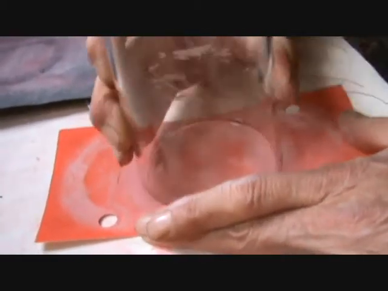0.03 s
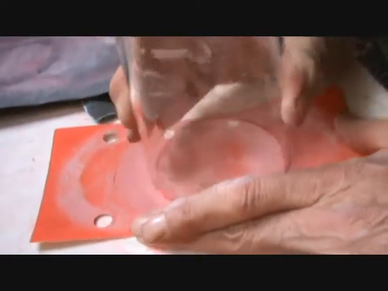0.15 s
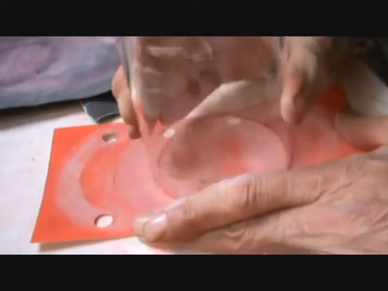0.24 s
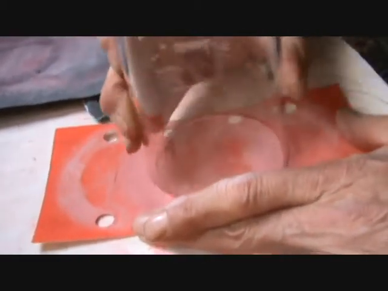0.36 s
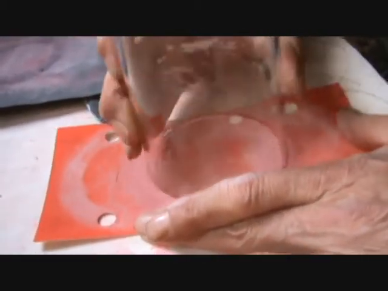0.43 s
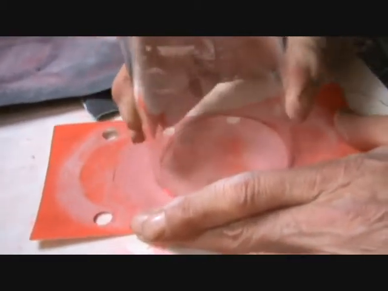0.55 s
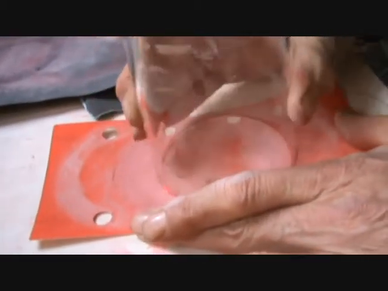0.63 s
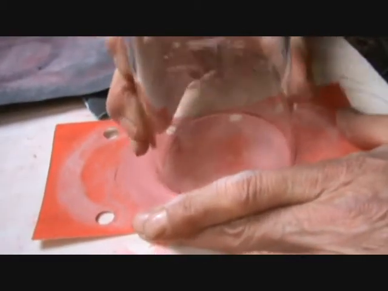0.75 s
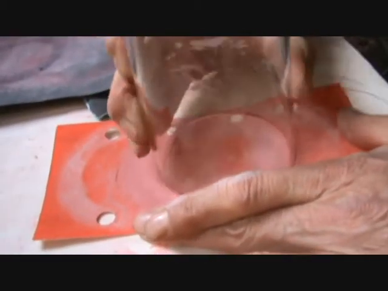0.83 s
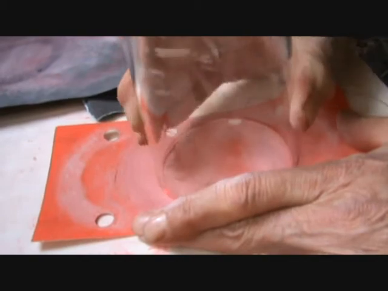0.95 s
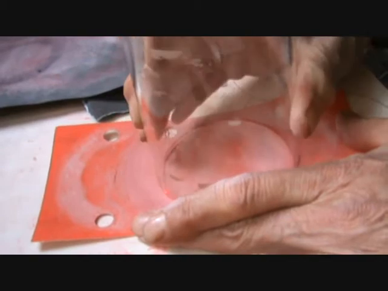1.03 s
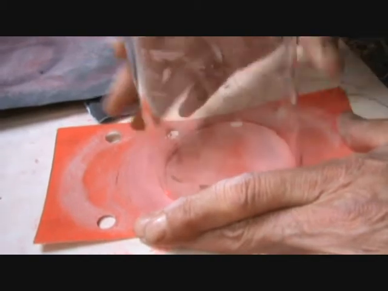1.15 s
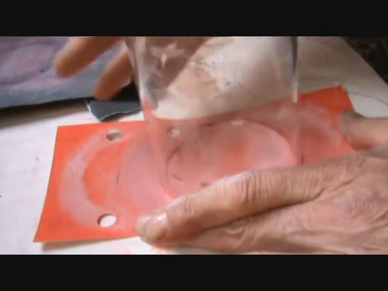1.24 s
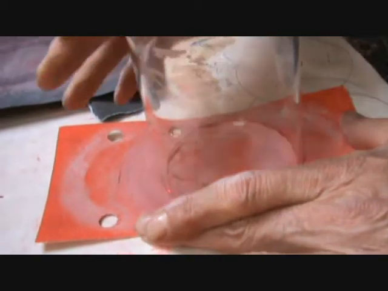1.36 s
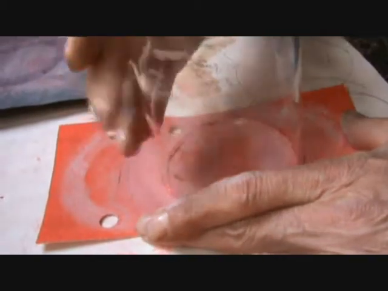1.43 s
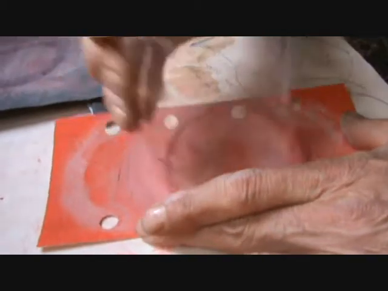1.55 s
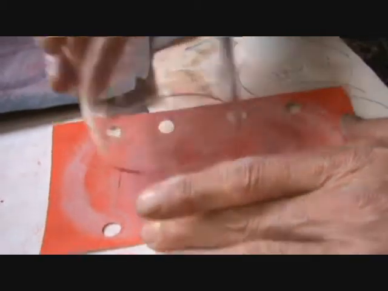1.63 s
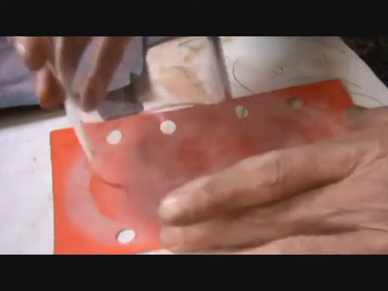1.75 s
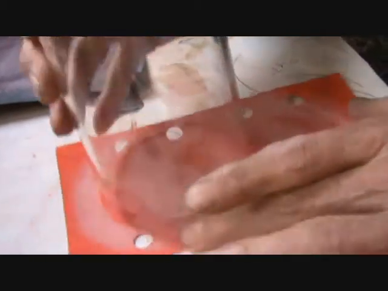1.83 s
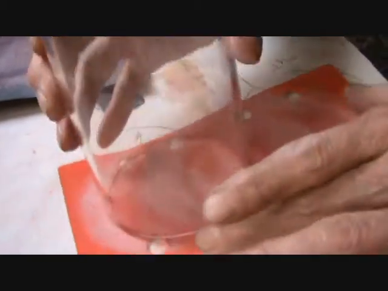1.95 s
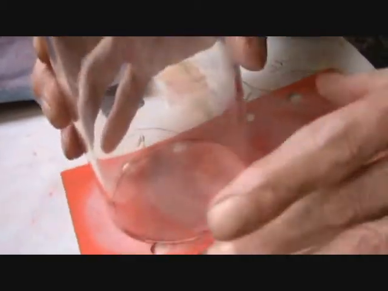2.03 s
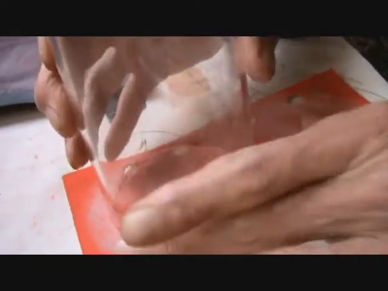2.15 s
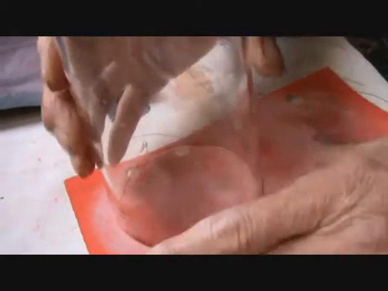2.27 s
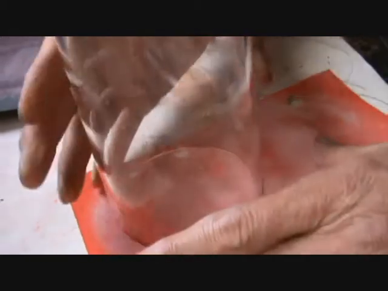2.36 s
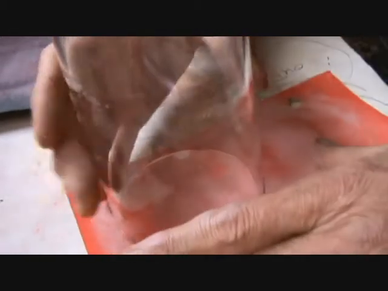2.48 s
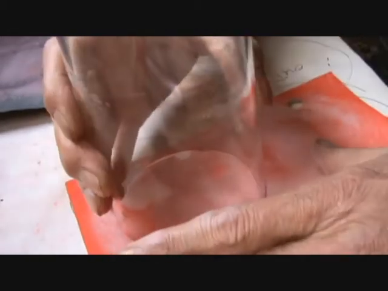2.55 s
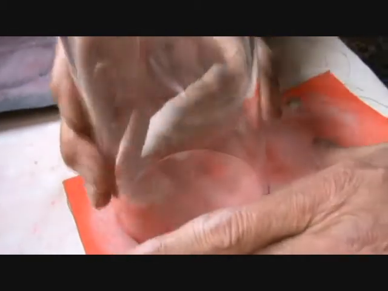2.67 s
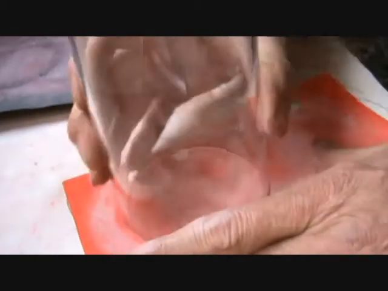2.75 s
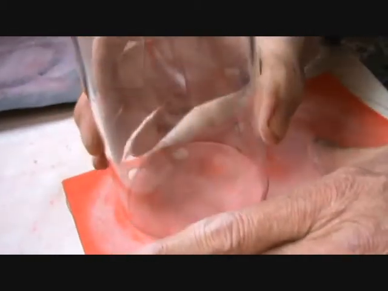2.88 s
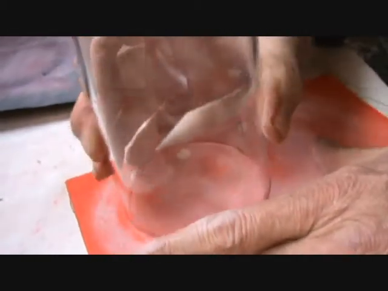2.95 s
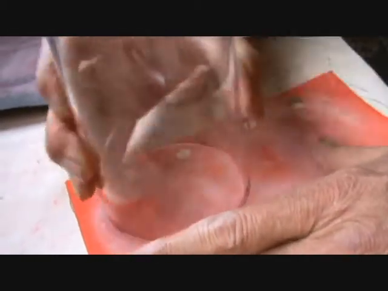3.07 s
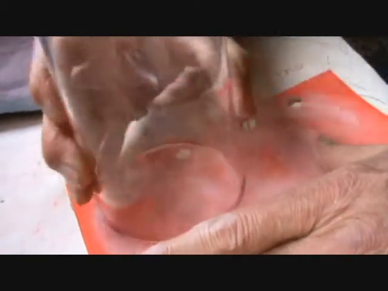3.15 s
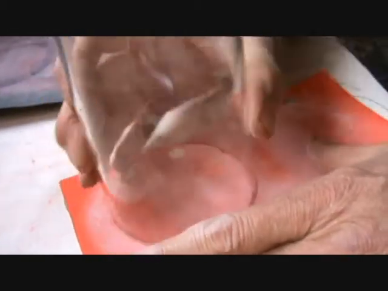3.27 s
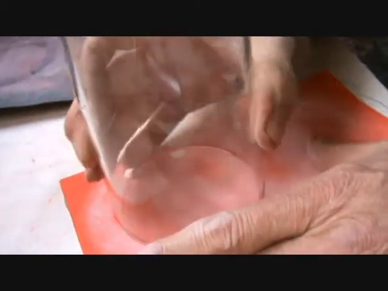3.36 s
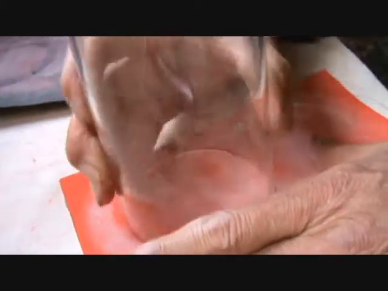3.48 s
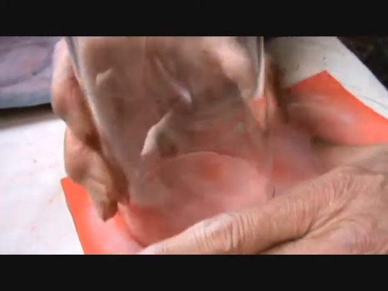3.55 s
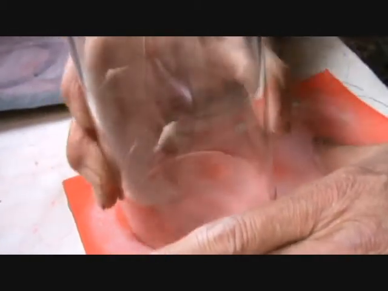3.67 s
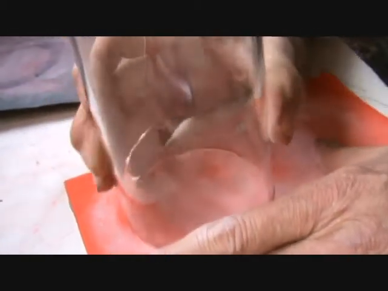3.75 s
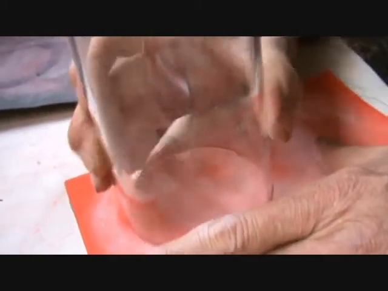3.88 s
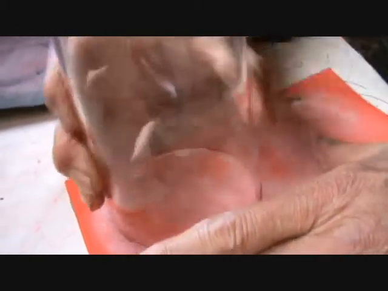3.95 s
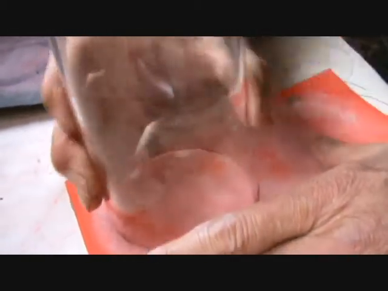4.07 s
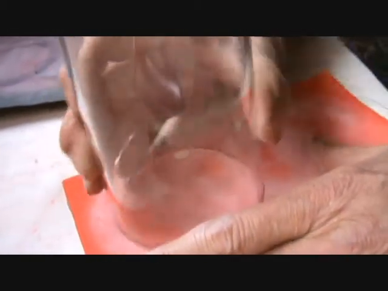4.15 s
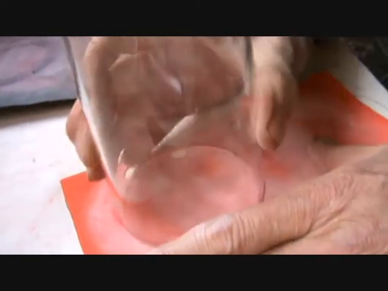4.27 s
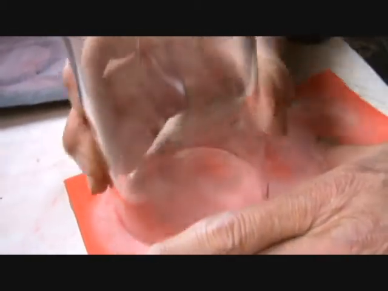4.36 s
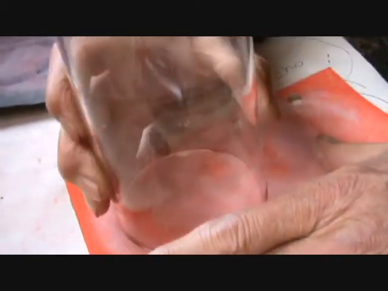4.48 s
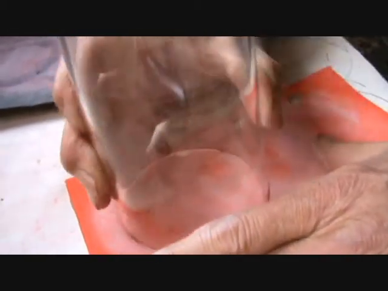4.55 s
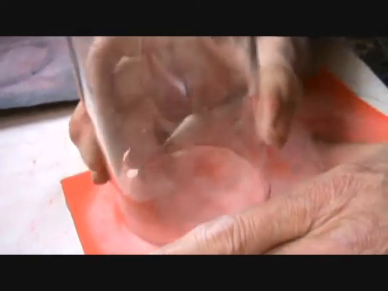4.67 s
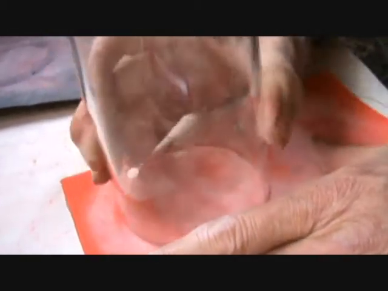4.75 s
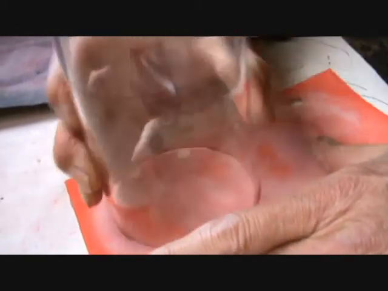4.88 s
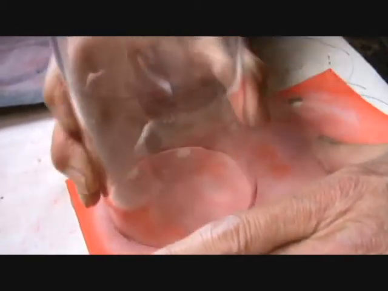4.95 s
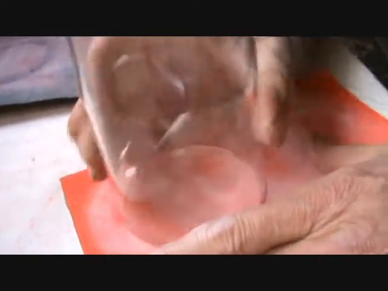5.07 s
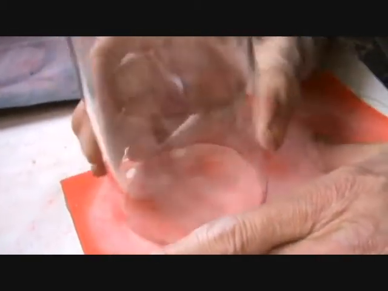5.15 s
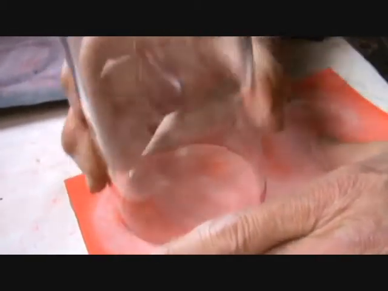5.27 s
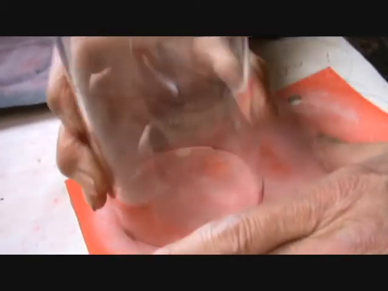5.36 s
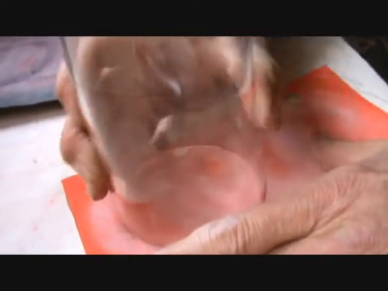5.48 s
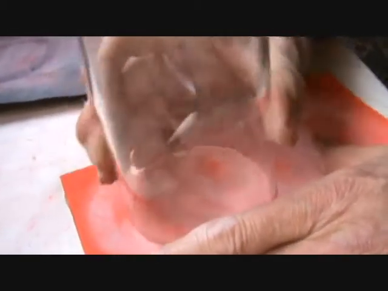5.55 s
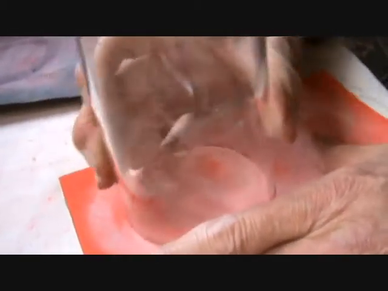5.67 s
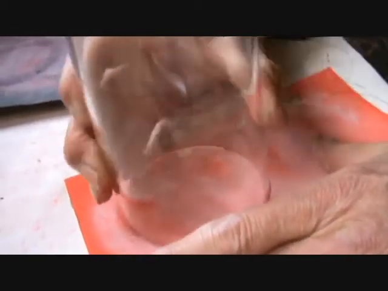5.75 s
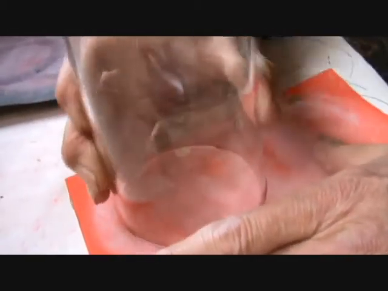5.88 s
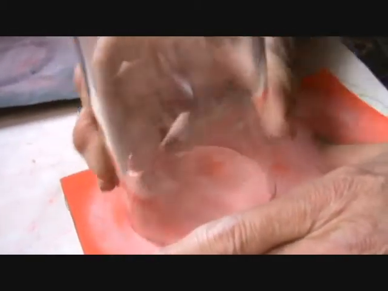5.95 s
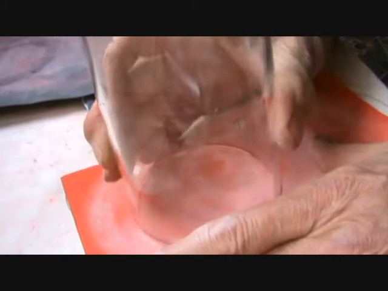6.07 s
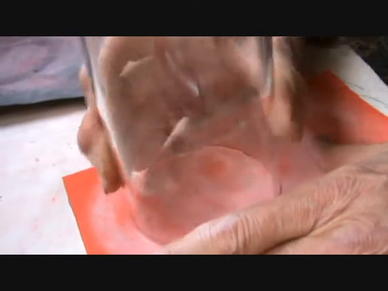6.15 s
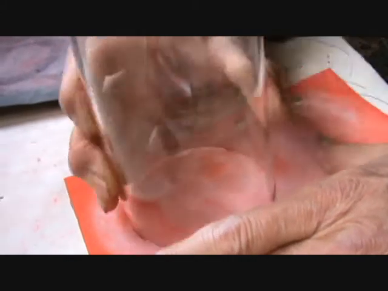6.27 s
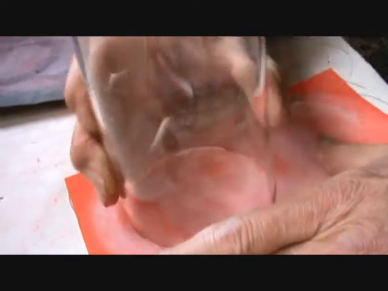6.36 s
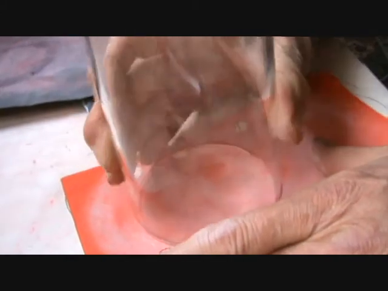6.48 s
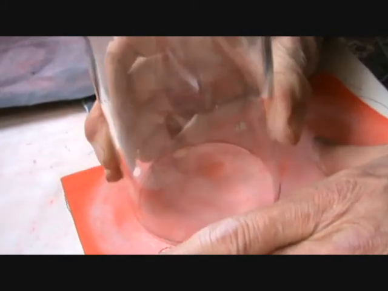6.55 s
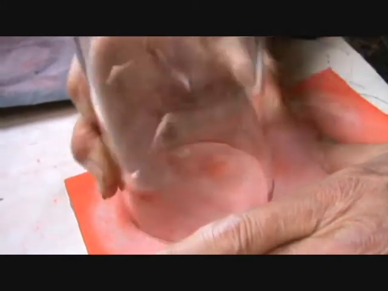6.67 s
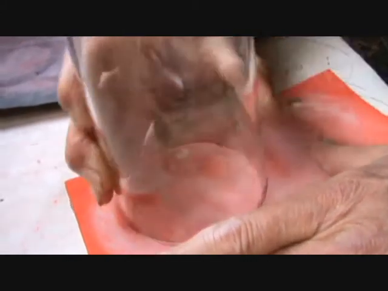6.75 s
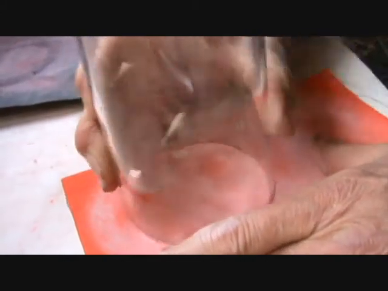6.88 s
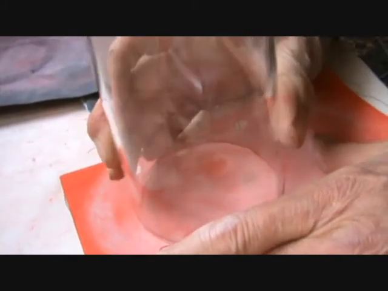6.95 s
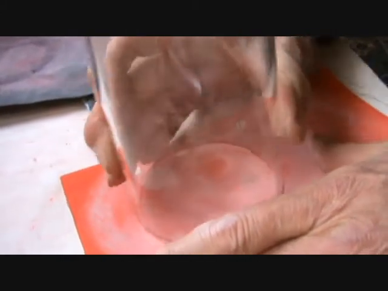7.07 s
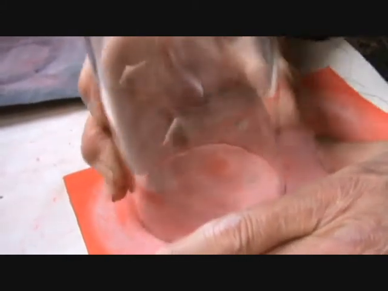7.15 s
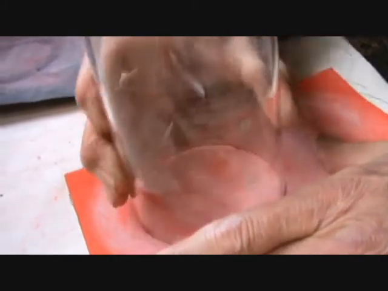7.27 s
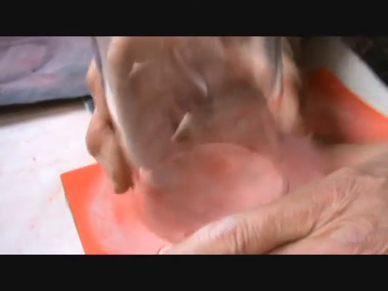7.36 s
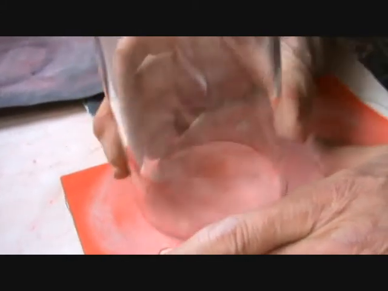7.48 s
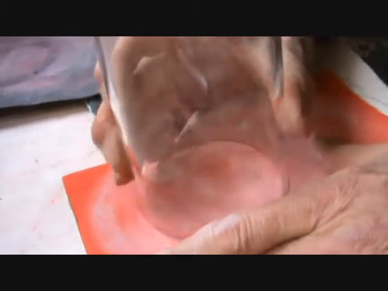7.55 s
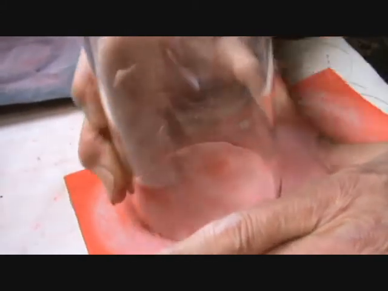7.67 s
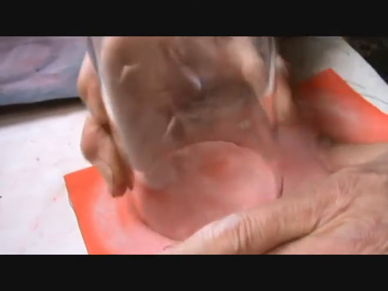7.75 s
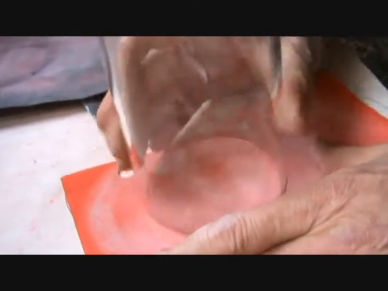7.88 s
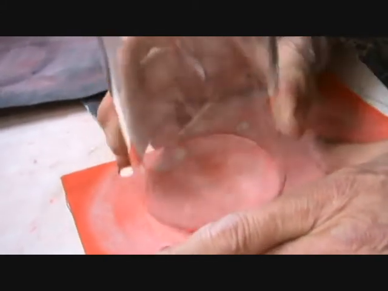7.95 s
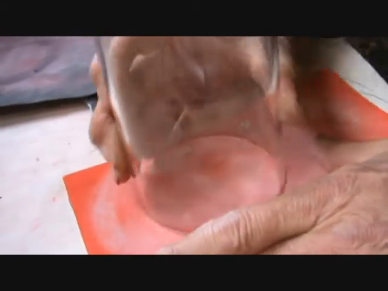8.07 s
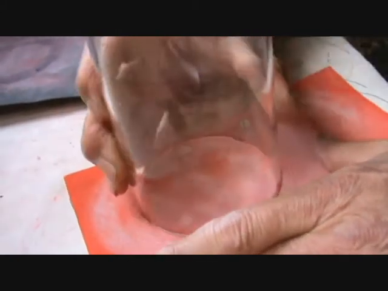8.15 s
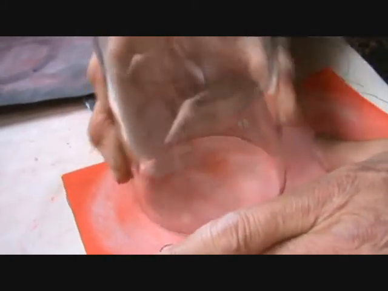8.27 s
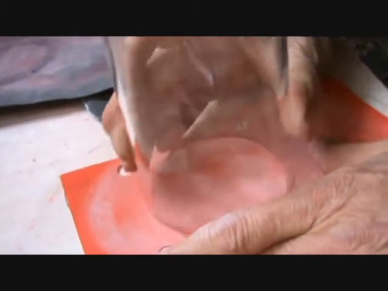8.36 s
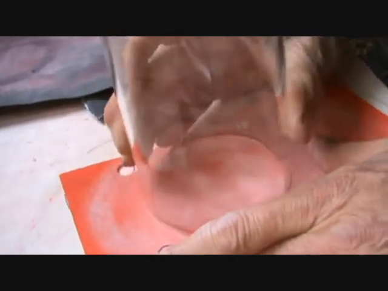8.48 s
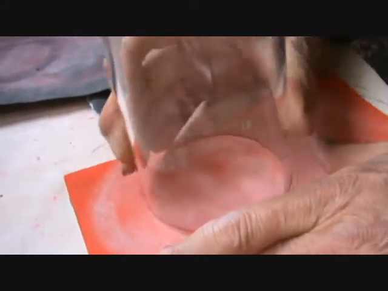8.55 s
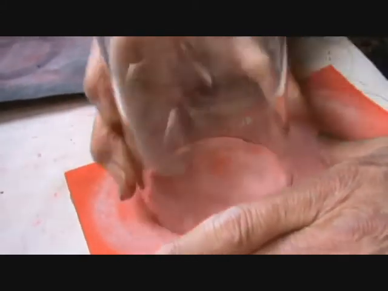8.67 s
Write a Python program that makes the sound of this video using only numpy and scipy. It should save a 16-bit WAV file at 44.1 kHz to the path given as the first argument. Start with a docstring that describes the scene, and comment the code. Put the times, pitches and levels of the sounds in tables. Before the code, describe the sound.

Close up on a workbench in a small, dry room, a hollow plastic tube is twisted on sandpaper: six quick rasping scratches, then a pause with light finger ticks, scuffs, sliding paper and dull bench thumps. The scratching resumes slightly slower and continues steadily to the end, with faint low shudders from the bench underneath. Close stereo microphone, quiet background hush.

```python
"""On a workbench in a small room, the rim of a wide plastic tube is twisted to and fro on sandpaper.
Streams of random grains make the scratch and excite resonances of the tube wall and the air inside.
In a pause the rim scuffs, the paper slides as swelling hiss, and pats boom through the bench modes.
Finger ticks are short tones with noise; a shaking bench, low rumble and steady hush lie underneath.
The stereo image is that of a close microphone with two ports."""
import sys
import numpy as np
from scipy import signal
from scipy.fft import rfft, irfft
from scipy.io import wavfile
from scipy.ndimage import uniform_filter1d

SR = 44100
rng = np.random.default_rng(int(sys.argv[2]) if len(sys.argv) > 2 else 0)


def master(y):
    """Save y as 16-bit WAV."""
    cut = np.clip(np.atleast_2d(y).T, -1, 1)
    pcm = np.round(cut * 32767)  # scale
    wavfile.write(sys.argv[1], SR, pcm.astype(np.int16))


N = 384552  # samples

# Twists of the rim: (start [s], length [s], scratch [dB], sag over the stroke [dB], second push [dB],
#  scratch fade [dB/s], air ring against scratch [dB],
#  bench shake delay [s], shake level [dB], shake pitch [Hz])
STROKES = [(0.0, 0.13, -23.5, 3, -0.5, 576, -12, .0, -43.5, 96.6),
           (0.175, 0.13, -21.5, 3, 3, 488, -14.5, 0.071, -31.5, 97.4),
           (0.384, 0.13, -19.5, 7.5, -0.5, 492, -11, 0.047, -42, 105.4),
           (0.573, .13, -21.5, 3.5, 1.5, 463, -13.5, 0.061, -37, 96.1),
           (0.776, 0.12, -22, 3.5, 2, 463, -11.5, 0.087, -31.5, 98.7),
           (0.962, 0.13, -21.5, 3, 1.3, 165, -10.5, 0.08, -36, 97),
           (2.733, 0.19, -26.5, -4, 4, 289, -13.5, 0.17, -42, 80),
           (3.06, 0.17, -20, 1, -2, 535, -11.5, 0.17, -45, 68.9),
           (3.28, 0.18, -18.5, 7, 0.5, 478, -19, 0.067, -42, 83),
           (3.524, 0.15, -17.5, 7.5, -0.8, 600, -13.5, 0.071, -50, 93.1),
           (3.753, 0.15, -21, 3.5, 0.5, 567, -10, 0.059, -46, 94),
           (3.982, .13, -21.5, 0.5, -1, 553, -13, 0.056, -42, 99.8),
           (4.168, 0.17, -22, 4, 3, 533, -10.5, .125, -38.5, 97.4),
           (4.43, 0.15, -20, 4.5, 2, 536, -12, 0.023, -48, 98.5),
           (4.645, 0.16, -23, 1, 0.7, 583, -12.5, .08, -37, 101),
           (4.891, 0.13, -19, 3.5, -2.5, 477, -12, 0.083, -30.5, 90.1),
           (5.071, 0.16, -21.5, 1.5, 3, 550, -17, 0.083, -42, 92.8),
           (5.317, 0.17, -21.5, 5.5, 4.5, 510, -12.5, 0.024, -45, 82),
           (5.549, 0.14, -19, 6, 3, 542, -17.5, .04, -45, 92.8),
           (5.789, 0.14, -18.5, 8, 0, 554, -12.5, 0.083, -40, 85.04),
           (5.992, 0.15, -18.5, 8, 1.7, 482, -13.5, .0, -50, 85),
           (6.236, 0.15, -21.5, 4.5, 0.2, 443, -9.5, 0.0434, -47.5, 81),
           (6.465, 0.15, -22, -0.5, -3, 520, -10.5, .07, -40, 97.5),
           (6.72, 0.12, -19, 4.5, 0, 500, -13.5, 0.073, -38.5, 94.5),
           (6.914, 0.16, -22, 3, 1.5, 560, -11.5, 0.1, -49, 103.7),
           (7.176, 0.15, -22.5, 2, 4, 468, -12, 0.032, -45.5, 73.8),
           (7.393, 0.17, -23, 0, -2.5, 450, -10, .04, -44.5, 68),
           (7.659, 0.14, -20, 3.5, -1.5, 470, -10.5, .05, -41, 80),
           (7.856, 0.15, -23, -3, -1.3, 400, -11.5, 0.084, -37.5, 80),
           (8.127, 0.15, -20.5, 4, 1, 457, -12.5, .025, -46, 70.5),
           (8.352, 0.18, -19, 7, -0.5, 472, -10.5, 0.19, -40, 98.5),
           (8.625, 0.16, -23, 9, 15, 440, -9, 0.081, -38, 79)]
# Brief touches of rim on paper: (peak time [s], scratch [dB], 12 dB rise [s], decay by 60 dB [s],
#  wall ring against scratch [dB], air ring against scratch [dB])
SCUFFS = [(1.201, -40, 0.017, 0.079, -23, -11), (1.433, -57, 0.0059, 0.045, -20, -20),
          (1.503, -53, 0.0033, 0.066, -20, -20), (1.619, -31.5, 0.014, 0.12, 1, -14),
          (1.639, -28, .002, 0.043, -21, -16), (1.674, -33, 0.028, 0.077, -5, -8),
          (1.925, -38, 0.0025, 0.052, 6, -17), (1.95, -40, .003, 0.035, 7, -12),
          (2.003, -21, 0.012, 0.075, 0, -9), (2.099, -34, 0.04, 0.16, 1, -24),
          (2.189, -38.5, 0.0045, 0.044, -12, -9), (2.205, -46.5, .003, 0.19, -6, 2),
          (2.275, -40.5, 0.0037, 0.034, -20, -3), (2.543, -26.5, 0.0086, 0.098, -4.5, -31),
          (2.629, -25.5, 0.01, 0.056, -12, -25), (2.678, -24.5, 0.0082, 0.043, -12, -17),
          (2.717, -24.5, .003, 0.041, -9, -15)]
# Wall ring through the scene: (time [s], level against scratch [dB])
WALL_RING = [(0, -0.5), (1.1, 0), (2.7, -3.5), (3.7, -4.5), (5, -3.5), (6.2, -4.5), (7.5, -3), (8.72, -4)]
# Strong close pair of wall resonances: (frequency [Hz], width [Hz], level [dB])
WALL_MODES = [(1426, 68, -6), (1479, 36.6, -4)]
# Higher wall resonances: (frequency [Hz], width [Hz], level [dB])
OVERTONES = [(2715, 140, -15.5), (2986, 84, -16.5), (3292, 31, -21), (5230, 170, -25.5), (6010, 150, -19.5),
             (7137, 130, -17.5), (9270, 810, -13.5)]
# Shared level of the higher wall resonances: (time [s], level [dB])
UPPER_RING = [(0, 0.1), (2.8, 0.5), (4.5, 0.5), (6.2, -2.5), (7.5, 0.1), (8.72, -0.5)]
# Resonance of the air in the tube: (frequency [Hz], width [Hz])
AIR_MODE = (447, 55)
# Tube colour in the sum of the two microphones: (frequency [Hz], level [dB per Hz])
SUM_COLOUR = [(60, -16), (140, -14), (200, -5.5), (370, -9), (600, -3), (1100, -7.5), (2060, -5.5),
              (2700, -4), (4000, -3.5), (6000, 1), (9500, -2.5), (11700, -17.5), (13100, -41),
              (14500, -20.5), (15800, -17)]
# Tube colour in their difference: (frequency [Hz], level [dB per Hz])
DIFFERENCE_COLOUR = [(60, -15), (320, -14), (700, -9), (1280, -15), (1480, -30), (1620, -12.5), (1910, -24),
                     (2830, -20), (6000, -15), (12000, -16), (14300, -22), (15500, -56.5)]
# How the difference follows the sum: (frequency [Hz], share [0-1], lead [rad])
LEAN = [(60, .6, 2.2), (130, .6, 1.8), (260, 0.6, 1.05), (450, 0.77, 0.59), (830, 0.59, 0.27),
        (1320, 0.39, 1.6), (8000, 0.24, 2.4), (12000, .2, 1.7)]
# Relative colour of the weak slide between strokes: (frequency [Hz], level [dB per Hz])
CREEP_COLOUR = [(150, -15), (400, -12.5), (900, -17), (2000, -17), (5000, -18), (8000, -21), (11000, -29.5),
                (16000, -43)]
# Swells of the sheet sliding over the bench: (loudest time [s], level [dB], rise [s], fall [s])
SLIDES = [(1.19, -49, 0.073, 0.077), (1.349, -51, 0.077, 0.093), (1.58, -51, 0.23, 0.051),
          (1.78, -45.5, 0.24, .1), (1.88, -43, 0.11, 0.17), (1.98, -42, 0.089, .03),
          (2.08, -40, 0.068, 0.072), (2.2, -44.5, 0.051, 0.025), (2.27, -50.5, .06, .05),
          (2.36, -39.5, 0.066, 0.094), (2.51, -49, 0.16, 0.059), (2.66, -39.5, 0.084, 0.044),
          (2.73, -32, 0.057, 0.034)]
# Relative colour of the sliding sheet: (frequency [Hz], level [dB per Hz])
DRAG_COLOUR = [(300, -14), (600, -12.5), (1100, -15.5), (2500, -14), (4300, -11.5), (5600, -12.5),
               (9000, -14.5), (11500, -26.5), (16000, -33)]
# Fingers on the tube: (time [s], level [dB], pitch [Hz], rise [s], decay by 60 dB [s],
#  noise against tone [ratio])
TICKS = [(1.281, -32.5, 1110, 0.0013, 0.055, 1.7), (1.325, -47, 1010, 0.0023, 0.043, 0.71),
         (1.345, -46, 1170, 0.0025, 0.14, 5.5), (1.447, -39.5, 464, 0.0048, 0.064, 2.8),
         (1.549, -43, 900, 0.0022, 0.034, 1.1), (1.68, -28, 412, 0.028, 0.14, .05),
         (1.775, -43, 1040, .002, 0.054, .4), (8.077, -32, 1097, 0.0021, .05, 1.5),
         (8.326, -36, 1060, 0.00186, 0.09, 2.3)]
# Blows on the bench: (time [s], level before the low cut [dB], sharpness [Hz])
PATS = [(0.826, -24, 220), (0.841, -14.5, 252), (2.03, -37, 90), (2.095, -7.5, 650), (2.102, -7.5, 704),
        (2.116, -10.5, 497), (2.198, -21.5, 222), (2.279, -18, 297), (2.383, -32.5, 400), (2.434, -33, 350),
        (2.463, -38, 600), (2.638, -31, 150)]
# Modes of the bench: (frequency [Hz], level [dB], decay by 60 dB [s])
BENCH_MODES = [(103, 1.5, 0.12), (165, 2, 0.082), (237, -3, 0.1), (298, -21, 0.076), (432, -3.5, 0.2),
               (474, -6, 0.089), (680, -14, 0.077), (800, -9.5, 0.18), (920, -17, .05)]
# Deep rumble: (time [s], level [dB])
RUMBLE = [(0, -50), (1.2, -47.5), (1.9, -57), (2.04, -41), (2.5, -53.5), (4.8, -46), (6.1, -48),
          (7.6, -44.5), (8.3, -48), (8.6, -41), (8.72, -48)]
# Relative colour of the steady background: (frequency [Hz], level [dB per Hz])
HUSH_COLOUR = [(90, -14), (150, 0), (320, -6), (500, -12), (1380, -21), (5800, -28), (11300, -31),
               (16000, -32)]
# Faint thin tones: (frequency [Hz], width [Hz], level [dB])
WHINE = [(12274, 20, -69), (13275, 15, -76)]

# Onset of a stroke: a rise over BITE_S with a small decaying boost
BITE_S, BITE_CURVE, BITE_DB, BITE_DECAY_S = 0.031, 0.62, 0.5, 0.024
UNEVEN_DB = 0.66  # drift of hand pressure
PUSH_AT, PUSH_WIDTH = 0.68, 0.17  # shares of the stroke length
# Each shake slides down in pitch around its peak, and has a rounded top between steep flanks
SHAKE_DROP_HZ, SHAKE_DROP_S = 8.1, 0.035
SHAKE_RISE_DB_PER_S, SHAKE_FALL_DB_PER_S, SHAKE_TOP_S = 330, 260, 0.037
HUSH_DB = -57
EDGE_HZ = 15780  # upper band limit


def tube():
    """Grit scratches the rim and is heard directly; other grains ring the tube wall and its air."""
    scratch, wall, air = contact()[:, None]
    direct = grit(spread_db=1.5, flutter_db=0.93)
    driving = grit(spread_db=1.5, flutter_db=1.0)

    # Dull and bright parts drift apart as the rim tilts
    dull = signal.lfilter(*signal.butter(2, 4200, fs=SR), direct)
    bright = direct - dull
    direct = wander(db=0.6) * dull + wander(db=1.13) * bright

    rings = 0
    for hz, width, db in OVERTONES:
        rings = rings + gain_of(db) * wander(db=2.2) * resonate(scratch * driving, hz, width)
    rings = rings * gain_of(curve(UPPER_RING)[0])
    for hz, width, db in WALL_MODES:
        rings += gain_of(db) * resonate(wall * driving, hz, width)
    rings += gain_of(2.0) * wander(db=1.5, smooth=1200) * resonate(air * driving, *AIR_MODE)
    return gain_of(5.) * microphones(scratch * direct + rings, SUM_COLOUR, DIFFERENCE_COLOUR)


def contact():
    """Amplitudes with which the rim drives the scratch, wall ring and air ring; touches add in power."""
    power = np.zeros((3, N))
    for s, length, level_db, sag_db, push_db, fade, air_db, *_ in STROKES:
        t = np.arange(0, length + .2, 1 / SR)
        db = level_db - sag_db * np.minimum(t / length, 1) + BITE_DB * np.exp(-t / BITE_DECAY_S)
        db = db + push_db * np.exp(-((t / length - PUSH_AT) / PUSH_WIDTH) ** 2)
        # As the rim slows down, the rings die faster than the scratch
        db = db - fade * np.c_[1, 1.4, 1.3].T * np.maximum(t - length, 0)
        already_moving = s < .01
        bite = np.clip(t / BITE_S + already_moving, 0, 1) ** BITE_CURVE
        wall_db = np.interp(s, *np.transpose(WALL_RING))
        add(power, s - .003, (bite * gain_of(db + np.c_[0, wall_db, air_db].T)) ** 2)
    power = power * wander(db=UNEVEN_DB, smooth=1200) ** 2

    for s, peak_db, rise, t60, wall_db, air_db in SCUFFS:
        t = np.arange(-2 * rise, t60, 1 / SR)
        db = peak_db + np.where(t < 0, 12 * t / rise, -60 * t / t60)
        add(power, s - 2 * rise, gain_of(db + np.c_[0, wall_db, air_db].T) ** 2)
    return np.sqrt(power)


def grit(spread_db, flutter_db):
    """Two streams of dense grains of uneven size, under one shared flutter of level."""
    size_db = spread_db * np.minimum(rng.exponential(1, N), 4)
    grains = rng.standard_normal((2, N)) * gain_of(size_db)
    flutter = drift(300)
    return evened(grains * gain_of(flutter_db * flutter))


def microphones(x, sum_points, difference_points):
    """Two ports close together: their difference is part the sum itself, part sound by other paths."""
    hz, lean = np.fft.rfftfreq(N, 1 / SR), np.array(LEAN)
    share = np.clip(read(lean[:, :2], hz), 0, 1)
    lead = read(lean[:, ::2], hz)
    following = share * np.exp(1j * lead) * rfft(x[0])
    independent = np.sqrt(1 - share ** 2) * rfft(x[1])
    other = irfft(following + independent, N)
    mid, side = coloured(x[0], sum_points), coloured(other, difference_points)
    return np.array([mid + side, mid - side])


def creep(start_db=-41, fade_db_per_s=25):
    """The rim slides a little as it turns back: a dull, wide hiss too weak to ring the tube."""
    level, t = np.zeros(N), np.arange(0, .13, 1 / SR)
    for s, length, *_ in STROKES:
        add(level, s + length, gain_of(start_db - fade_db_per_s * t))
    hiss = evened(coloured(grit(spread_db=1.5, flutter_db=0.5), CREEP_COLOUR))
    a, b = hiss * level * wander(db=1.5)
    return np.array([a + 0.66 * b, a - 0.57 * b])


def paper(edge_db=-20):
    """Paper sliding on the bench: coloured grain noise swells and dies along a bell in dB."""
    t = np.arange(N) / SR
    power = 0
    for s, db, rise, fall in SLIDES:
        distance = (t - s) / np.where(t < s, rise, fall)
        power = power + gain_of(db + edge_db * distance ** 2) ** 2
    hiss = evened(coloured(grit(spread_db=1.2, flutter_db=2.0), DRAG_COLOUR))
    a, b = hiss * np.sqrt(power)
    return np.array([a + 0.43 * b, a - 0.42 * b])


def fingers():
    """Small dull ticks of tone and noise; a slow one is nearly all tone, the hoot of air in the tube."""
    out = np.zeros(N)
    for s, peak_db, hz, rise, t60, noise in TICKS:
        t = np.arange(6000) / SR - rise
        band = signal.butter(2, [550, 2000], "band", fs=SR)
        puff = signal.lfilter(*band, rng.standard_normal(len(t)))
        envelope = np.minimum(1 + t / rise, gain_of(-60 * t / t60))
        tone = np.sin(2 * np.pi * hz * t)
        add(out, s - rise, envelope * gain_of(peak_db) * (tone + noise * puff))
    return out


def judder():
    """Stick and slip shake the bench top once in every stroke, as tone and narrow noise of uneven pitch."""
    t, rows = np.arange(N) / SR, np.array(STROKES)
    peak_s, peak_db = rows[:, 0] + rows[:, 7], rows[:, 8]
    power = 0
    for s, db in zip(peak_s, peak_db):
        slope = np.where(t < s, SHAKE_RISE_DB_PER_S, SHAKE_FALL_DB_PER_S)
        rounded_s = np.hypot(t - s, SHAKE_TOP_S) - SHAKE_TOP_S
        power = power + gain_of(db - slope * rounded_s) ** 2

    # Pitch passes through one point above and one below the centre of each shake
    turning_s = (peak_s[:, None] + [-SHAKE_DROP_S, SHAKE_DROP_S]).ravel()
    turning_hz = (rows[:, 9:] + [SHAKE_DROP_HZ, -SHAKE_DROP_HZ]).ravel()
    hz = np.interp(t, turning_s, turning_hz)
    turn = 2 * np.pi * np.cumsum(hz) / SR
    a, b = evened(resonate(resonate(rng.standard_normal((2, N)), hz, 32), hz, 32))
    mid = 1.6 * np.sin(turn) + 0.3 * np.sin(2 * turn) + 0.61 * a
    side = 0.19 * np.cos(turn) - 0.24 * np.sin(turn) + 0.62 * b
    return np.sqrt(power) * np.array([mid + side, mid - side])


def pats():
    """A hand or the rim lands on the bench, which booms briefly; each blow stirs the modes differently."""
    boom, t = np.zeros(N), np.arange(SR // 3) / SR
    hz, db, t60 = np.transpose(BENCH_MODES)[:, :, None]
    chances = rng.standard_normal((len(PATS), 2, len(BENCH_MODES), 1))
    for (s, peak_db, sharp_hz), (level_chance, pitch_chance) in zip(PATS, chances):
        decay = gain_of(db + 2 * level_chance - 60 * t / t60)
        ring = (decay * np.cos(2 * np.pi * hz * (1 + .03 * pitch_chance) * t)).sum(0)
        # A softer blow lasts longer and rings fewer modes
        blow = np.convolve(np.hanning(int(SR / sharp_hz)), ring)
        add(boom, s - .002, gain_of(peak_db) * blow / abs(blow).max())
    boom = signal.lfilter(*signal.butter(2, 70, "high", fs=SR), boom)
    low = signal.lfilter(*signal.butter(2, 250, fs=SR), boom)
    # Lows lean right, the rest leans left
    return boom + np.c_[-.35, .35].T * low + np.c_[.35, -.35].T * (boom - low)


def room(x, t60=.35, wet_db=-26, dull_hz=5000):
    """Sparse reflections of random sign, different per side, die away duller than the direct sound."""
    taps = np.zeros((2, 16000))
    at = np.arange(200, 15980, 20) + rng.integers(0, 20, (2, 789))  # samples
    reflections = rng.choice([-1., 1.], at.shape) * gain_of(-60 * at / SR / t60)
    np.put_along_axis(taps, at, reflections, 1)
    taps = signal.lfilter(*signal.butter(1, dull_hz, fs=SR), taps / np.linalg.norm(taps[0]))
    return x + gain_of(wet_db) * signal.oaconvolve(x, taps, axes=1)[:, :N]


def hush():
    """Steady coloured noise, with a deep wandering rumble and two thin high tones of narrow noise."""
    a, b = gain_of(HUSH_DB) * evened(coloured(rng.standard_normal((2, N)), HUSH_COLOUR))
    level = gain_of(curve(RUMBLE, silent=-55)[0]) * wander(db=2.5, smooth=6000)
    rumble = level * evened(resonate(resonate(rng.standard_normal(N), 39, 57), 39, 57))
    tones = sum(gain_of(db) * resonate(rng.standard_normal(N), hz, width) for hz, width, db in WHINE)
    # A faint copy, shifted by one second, widens the rumble
    wide = 0.1 * np.roll(rumble, SR) * np.c_[1, -1].T
    return np.array([a + .5 * b, a - .5 * b]) + tones + rumble * np.c_[.93, 1.07].T + wide


def resonate(x, hz, width):
    """A resonance: shifts hz down to zero, smooths, and shifts back; white input keeps its power."""
    turn = np.exp(2j * np.pi * np.cumsum(hz * np.ones(N)) / SR)
    r = np.exp(-np.pi * width / SR)
    smooth = signal.lfilter([1], [1, -r], x / turn)
    return np.sqrt(2 * (1 - r * r)) * (turn * smooth).real


def coloured(x, points):
    """Filters a signal by a table of frequency and level."""
    hz = np.fft.rfftfreq(N, 1 / SR)
    return irfft(rfft(x) * gain_of(read(points, hz)), N)


def read(points, hz):
    """Reads a table between its points, along log frequency."""
    f, value = np.transpose(points)
    return np.interp(np.log(hz + 1), np.log(f + 1), value)


def curve(rows, silent=-90):
    """Columns of a table at every sample, with the silent value outside its times."""
    s, *columns = np.transpose(rows)
    return [np.interp(np.arange(N) / SR, s, c, silent, silent) for c in columns]


def drift(smooth):
    """Noise of unit power, averaged twice over a number of samples."""
    noise = rng.standard_normal(N)
    return evened(uniform_filter1d(uniform_filter1d(noise, smooth), smooth))


def wander(db, smooth=2500):
    """A gain that drifts at random."""
    return gain_of(db * drift(smooth))


def gain_of(db):
    """Amplitude for a level in dB."""
    return 10 ** (np.asarray(db) / 20)


def evened(x):
    """Scales each row to unit power."""
    return x / np.sqrt(np.mean(x ** 2, -1, keepdims=True) + 1e-20)


def add(mix, s, sound):
    """Lays a sound into the mix at s seconds, cut off at the end."""
    part = mix[..., max(round(s * SR), 0):][..., :sound.shape[-1]]
    part += sound[..., :part.shape[-1]]


def scene():
    """Tube, paper and fingers get room reflections; bench and background stay dry."""
    return room(tube() + creep() + paper() + fingers()) + judder() + pats() + hush()


def record(dry):
    """A steep low-pass limits the band."""
    low_pass = signal.firwin(511, EDGE_HZ, window=("kaiser", 9), fs=SR)
    return signal.oaconvolve(dry, low_pass[None], "same")


dry = scene()
out = record(dry)
master(out)
```